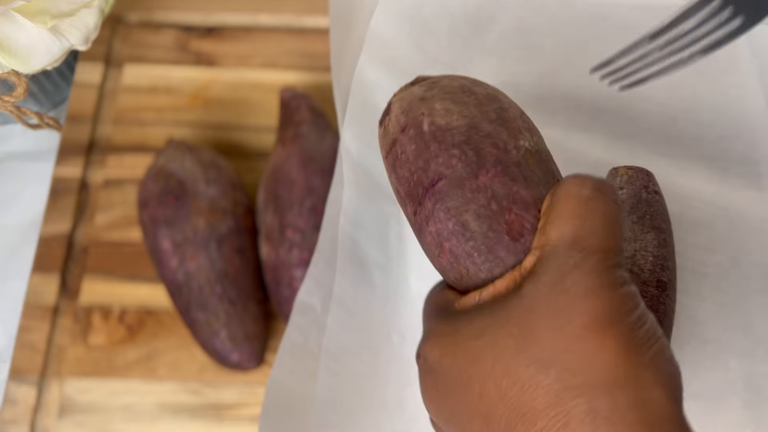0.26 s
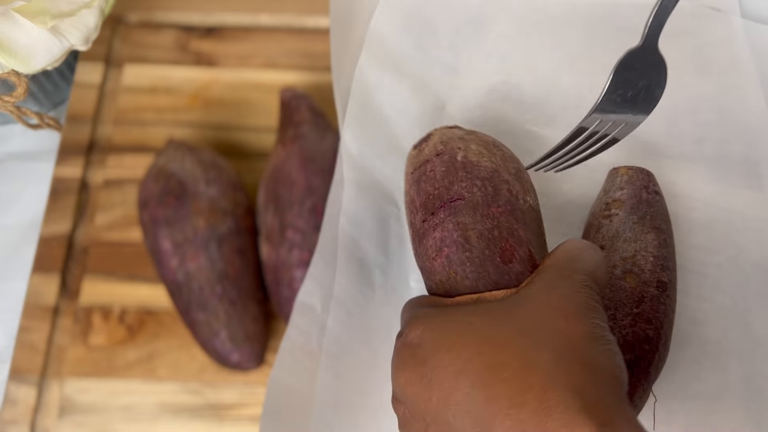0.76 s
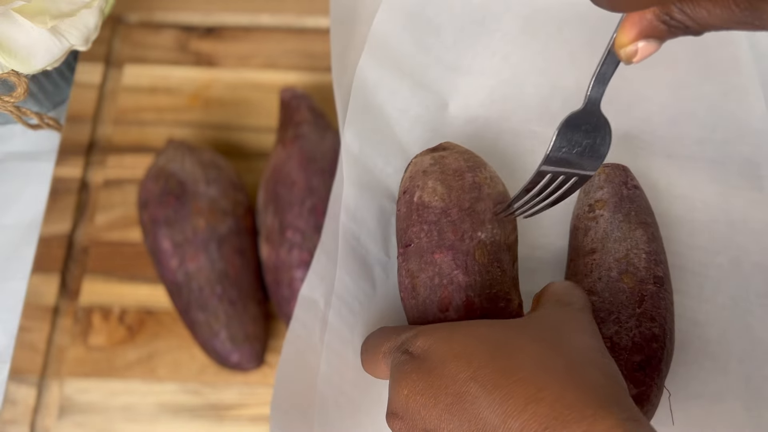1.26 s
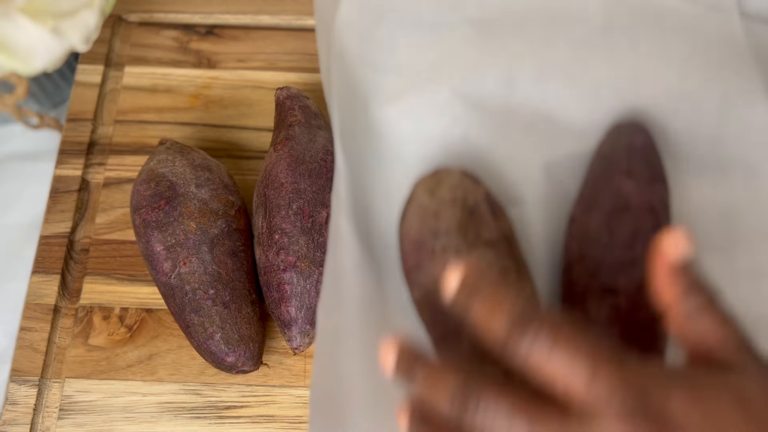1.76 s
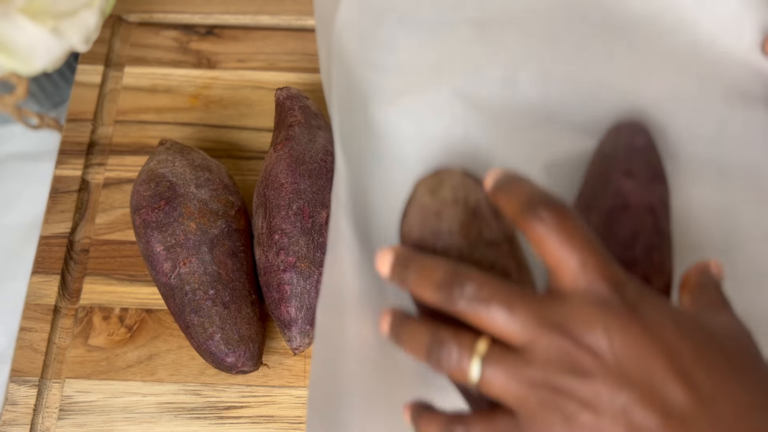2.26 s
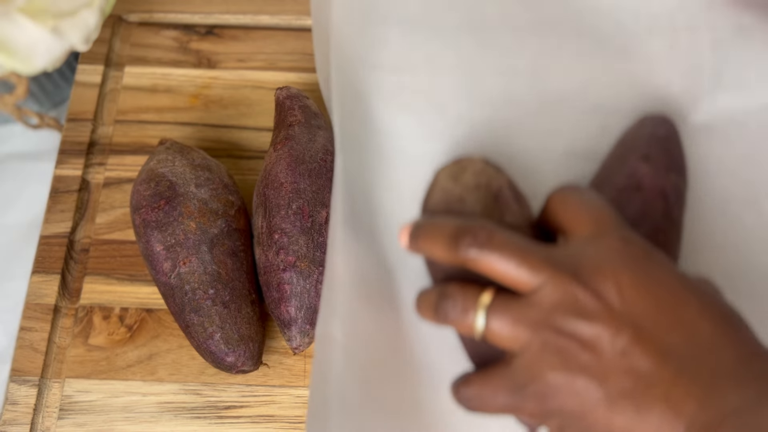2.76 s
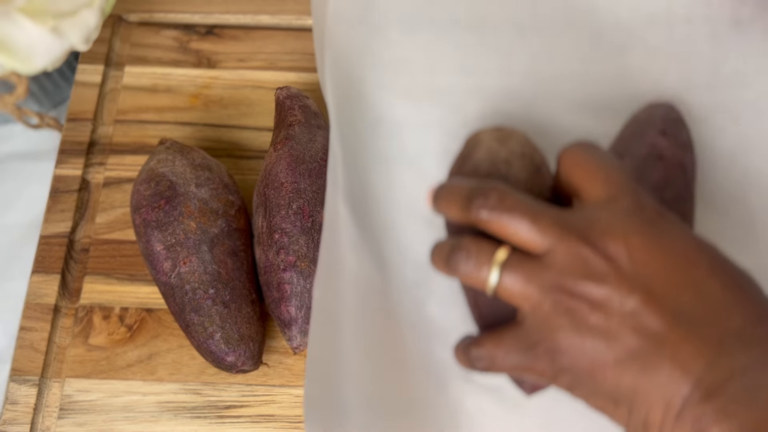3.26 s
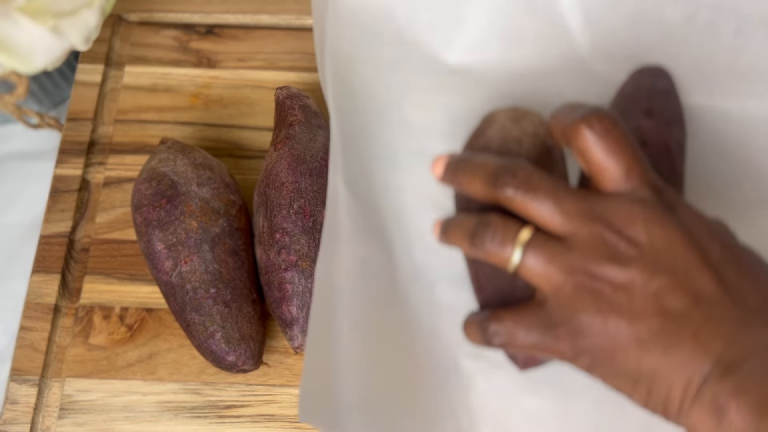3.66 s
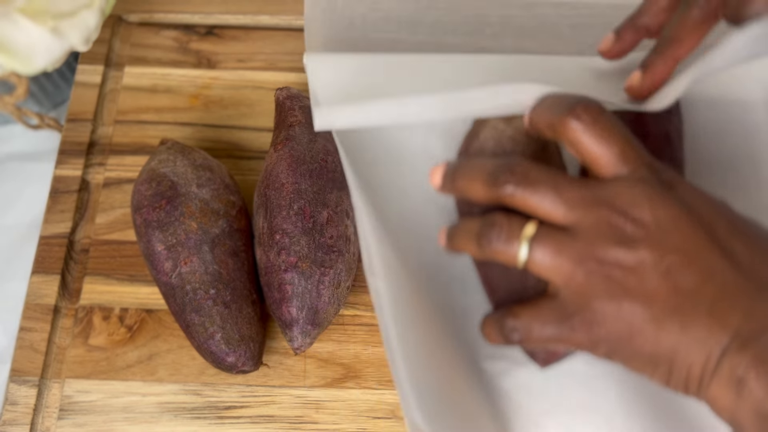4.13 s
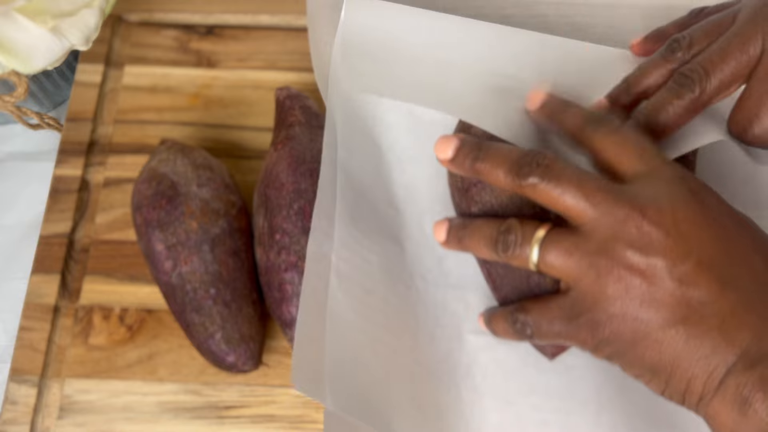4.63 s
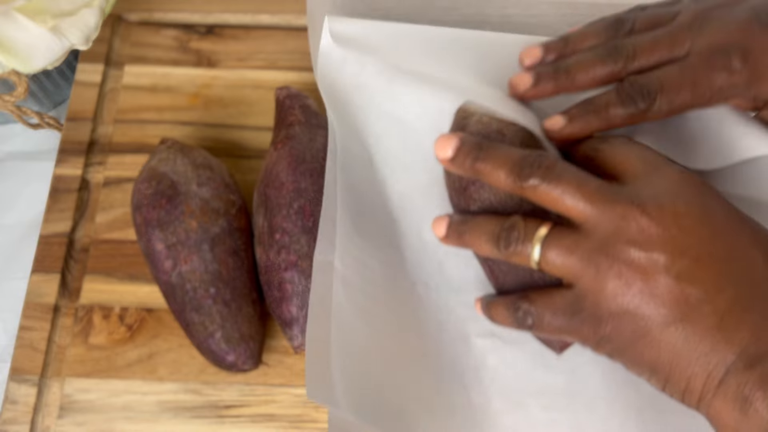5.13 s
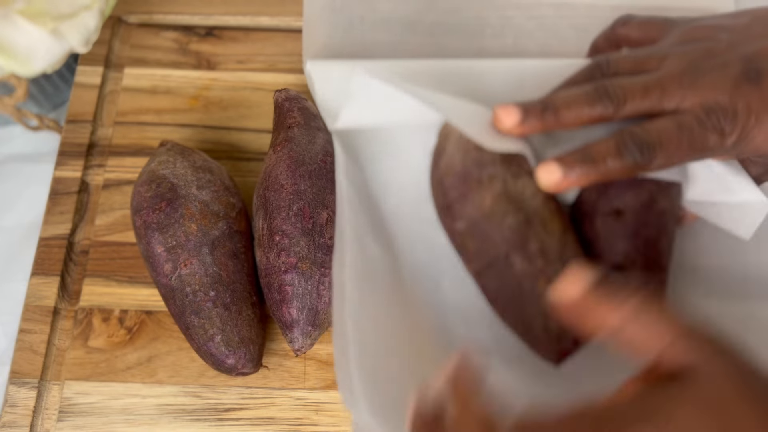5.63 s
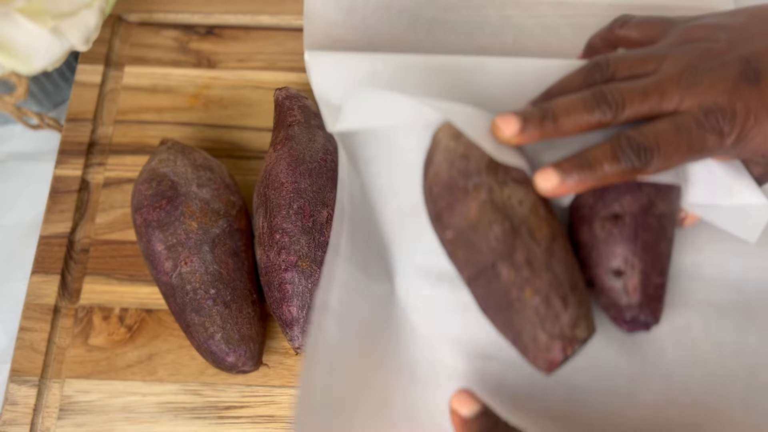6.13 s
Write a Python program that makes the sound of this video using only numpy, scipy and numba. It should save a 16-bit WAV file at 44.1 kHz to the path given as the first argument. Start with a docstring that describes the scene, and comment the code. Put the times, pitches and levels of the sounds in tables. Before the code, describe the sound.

Close by in a small kitchen, low woody bumps give way to bright, crisp crumpling of baking paper, over a quiet steady hum.

```python
"""Sweet potatoes wrapped in baking paper

Sweet potatoes are set down and shifted on baking paper over a wooden board, then the paper is folded over them.
Each bump rings the board's low modes; a dragged potato judders in a short, sagging hoot.
The stiff sheet rustles and crumples in swarms of tiny buckles, snaps at creases and pops as panels flip.
A phone close by, with two microphone ports, hears it in a small kitchen with a low steady hum and a faint whine.
"""
import sys
import numpy as np
from scipy import signal
from scipy.fft import rfft, irfft, next_fast_len
from scipy.io import wavfile
from scipy.ndimage import uniform_filter1d
from numba import njit

SR = 44100
rng = np.random.default_rng(int(sys.argv[2]) if len(sys.argv) > 2 else 0)


def file_out(sig):
    """Save sig as 16-bit WAV at sys.argv[1]."""
    # one column per channel
    cols = np.atleast_2d(sig).T
    # limit, then scale
    lim = np.clip(cols, -1, 1)
    pcm = np.round(lim * 32767).astype(np.int16)
    wavfile.write(sys.argv[1], SR, pcm)


N = 281799
T = np.arange(N) / SR

# rustle of the sheet sliding under the hands: [t/s, relative level/dB]
RUSTLE = [(2.09, -61), (2.26, -56.5), (2.45, -41), (2.64, -47), (2.83, -52.5), (2.94, -48), (3.18, -57),
          (3.34, -45), (3.56, -56), (3.94, -50.5), (4.01, -45.5), (4.4, -45.5), (4.58, -52.5), (5.1, -42),
          (5.26, -52), (5.46, -40), (5.57, -55), (5.72, -42), (6.01, -55.5), (6.27, -41), (6.38, -50)]
# colour of the tiny buckles and creases: [f/Hz, relative level/dB]
CRACKLE = [(300, -21.5), (1200, -15.5), (2500, 4.5), (3400, -2.5), (4800, 0), (6000, -1.5), (7200, -9.5),
           (8400, -6), (9500, -9.5), (12000, -15), (14000, -10), (16000, -19)]
# a whole panel flips over as the sheet is folded: [t/s, relative level over one millisecond/dB, pitch f/Hz]
POPS = [(4.261, -27.5, 1390), (4.355, -35, 1260), (4.51, -30, 1530), (4.6368, -29, 1350),
        (4.7701, -25, 1310), (4.778, -30, 1660), (4.793, -26.5, 1620), (4.803, -29, 1600),
        (4.8401, -17.5, 1540), (5.216, -32, 1125), (5.378, -23, 1220), (5.39, -27, 1400),
        (5.406, -30.5, 1170), (5.425, -24.5, 1350)]


def amp(db):
    """Decibels to gain."""
    return 10 ** (np.asarray(db) / 20)


def convolve(x, response):
    """Pass a sound through a response, channel by channel."""
    return signal.oaconvolve(np.atleast_2d(x), np.atleast_2d(response), axes=-1)[:, :N]


def colour(points, size=1024):
    """Causal (minimum-phase) response of unit energy, shaped by (Hz, dB) points."""
    hz, db = np.transpose(points)
    grid = np.maximum(np.fft.rfftfreq(size, 1 / SR), 1)
    spectrum = amp(np.interp(np.log(grid), np.log(hz), db))
    # folding the cepstrum onto positive times makes the response causal
    cepstrum = irfft(np.log(spectrum))
    cepstrum[1:size // 2] *= 2
    cepstrum[size // 2 + 1:] = 0
    response = irfft(np.exp(rfft(cepstrum)))
    return response / np.linalg.norm(response)


def hum(level_db=-49, apart_hz=900, side_gain=1.05):
    """Steady kitchen background of coloured noise; its bass is alike in both ports."""
    # spectrum of the room: [f/Hz, relative level per Hz/dB]
    hum_colour = [(25, -13), (52, 3), (200, -1), (390, -10), (620, -20.5), (900, -31), (1800, -27),
                  (3300, -40.5), (5200, -37), (8000, -51), (15000, -75)]
    mid, side = convolve(rng.standard_normal((2, N)), colour(hum_colour, size=8192))
    side = signal.sosfilt(signal.butter(1, apart_hz, "high", fs=SR, output="sos"), side)
    return amp(level_db) * (mid + side_gain * side * np.array([[1], [-1]]))


def whine(half_s=0.23, waver_hz=40, knot_samples=512):
    """A faint, thin tone wavers in pitch and flickers in level in the background, then goes."""
    # swells of the tone: [middle t/s, level before the flicker/dB, centre f/Hz]
    tones = [(0.18, -73, 3268), (1.68, -82, 3316)]
    knots = T[::knot_samples]
    waver = np.interp(T, knots, rng.standard_normal(len(knots)))
    flicker = np.interp(T, knots, rng.standard_normal(len(knots)))
    out = np.zeros(N)
    for at, db, hz in tones:
        swell = np.exp(-((T - at) / half_s) ** 4)
        phase = 2 * np.pi * np.cumsum(hz + waver_hz * waver) / SR
        out += amp(db) * swell * np.sin(phase)
    return flicker * out


def board(stiffen=0.097, settle_s=0.0074, thock_db=3, scuff_s=0.0021, split_hz=450):
    """A soft push per bump rings the modes; neighbours swing against each other, so the thud swells and beats."""
    # potatoes bump the board: [t/s, relative level/dB, contact/ms, ring time factor under the hand]
    bumps = [(0.056, -41, 4.1, 0.65), (0.825, -23.5, 1.3, 1), (0.8369, -2.5, 4.7, 1.44),
             (0.866, -26, 1.33, 0.7), (2.099, -26.5, 3.4, 0.76), (2.436, -29.5, 8.74, 1.83),
             (2.702, -25, 8.67, 0.9), (2.867, -33.5, 1.3, 0.3), (2.8805, -10, 6.6, 0.67),
             (3.034, -12.5, 8.2, 0.92), (3.082, -17, 6.4, 0.37), (3.373, -18, 8.9, 1.7),
             (3.388, -14, 1.34, 0.16), (3.3983, 0, 2.97, 0.94), (3.456, -7, 5.66, 0.78),
             (4.65, -29.5, 8.3, 0.95), (4.993, -29.5, 6.9, 1), (5.505, -28, 8.7, 0.58),
             (5.745, -28, 1, 0.5), (5.755, -16, 2.84, 0.62), (6.086, -25.5, 3.05, 1.2),
             (6.173, -23, 2.4, 0.56)]
    # modes of board and counter before each bump bends them: [f/Hz, relative level/dB, t60/s]
    modes = [(52.6, -21.5, 0.36), (68.74, -24, 0.89), (99.8, -26.5, 0.97), (138.9, -14, 0.26),
             (192.6, 3, 0.21), (225.5, -4.5, 0.28), (344, 0.5, 0.042), (260.5, 2.5, 0.22),
             (366, -10.5, 0.28), (533, -2.5, 0.06), (820, -6.5, 0.044), (1194, -8.5, 0.021)]
    # a contact of neutral_ms leaves the modes at their own pitch; a longer one loads the board and rings lower
    neutral_ms, load_exponent = 4.04, 0.028

    out, t = np.zeros(N + SR), T[:SR // 2]
    # the pressed contact is stiffer at first, so the pitch sags as it settles
    clock = t + stiffen * settle_s * (1 - np.exp(-t / settle_s))
    low = np.array(modes)[:, 0] < split_hz
    for at, db, contact_ms, ring_factor in bumps:
        pitch = (neutral_ms / contact_ms) ** load_exponent
        rings = []
        for k, (hz, mode_db, t60) in enumerate(modes):
            fade = np.exp(-np.log(1000) * t / (t60 * ring_factor))
            rings.append((-1) ** k * amp(mode_db) * np.sin(2 * np.pi * hz * pitch * clock) * fade)
        rings = np.array(rings)
        # a longer, softer contact favours the lowest modes
        push = np.sin(np.pi * np.minimum(t[:SR // 50] * 1000 / contact_ms, 1)) ** 2
        thud = signal.fftconvolve(rings[low].sum(0), push)[:len(t)]
        # a scuff of the rough skin wakes the upper modes; only a brief, hard contact makes it heard
        scuff = rng.standard_normal(len(t)) * t * np.exp(-t / scuff_s)
        thock = signal.fftconvolve(rings[~low].sum(0), scuff)[:len(t)]
        thock_gain = amp(thock_db + 10 * (0.5 - contact_ms))
        bump = thud / np.abs(thud).max() + thock_gain * thock / np.abs(thock).max()
        start = int(at * SR)
        out[start:start + len(t)] += amp(db) * bump
    return out[:N] + judder()


def judder():
    """A dragged potato sticks and slips near the board's main mode: a soft hoot that swells, sags and fades."""
    # one hoot: [peak t/s, level/dB, half width/s, f at the peak/Hz, sag/(Hz per s)]
    at, db, width_s, hz, sag_hz_per_s = (3.0605, -7.5, 0.0155, 191, 380)
    t = np.clip(T - at, -.3, .3)
    swell = np.exp(-(t / width_s) ** 2)
    return amp(db) * swell * np.sin(2 * np.pi * (hz * t - sag_hz_per_s * t ** 2 / 2))


def snaps(rows, ripple_db=4, slip_ms=0.69):
    """Each crease gives way in a quick, dying run of slips, with its own tilt and its own uneven colour."""
    out = np.zeros(N + SR)
    hz, db = np.transpose(CRACKLE)
    fade = np.exp(-T[:SR // 100] * 1000 / slip_ms)
    for at, level_db, tilt_db in rows:
        ripple = ripple_db * rng.standard_normal(len(hz))
        crease = colour(np.transpose([hz, db + tilt_db * np.log2(hz) + ripple]))
        # cubed noise: a few strong slips among many weak ones
        slips = fade * rng.standard_normal(len(fade)) ** 3
        click = np.convolve(crease, slips)
        start = int(at * SR)
        # the level is that of the whole click's energy spread over one millisecond
        out[start:start + len(click)] += amp(level_db) * np.sqrt(SR / 1000) * click / np.linalg.norm(click)
    return out[:N]


def avalanche(at, db, swell_ms):
    """Power of a run of buckles: each sets off more until the peak, then they die out."""
    power, start = np.zeros(N), int(at * SR)
    age = T[:min(SR // 5, N - start)] * 1000 / swell_ms
    power[start:start + len(age)] = (amp(db) * np.tanh(2 * age) * age * np.exp(1 - age)) ** 2
    return power


@njit
def grains(starts, hz, cycles, sizes, length):
    """Each grain is a brief ring at its own pitch, fading over a few cycles."""
    out = np.zeros(length)
    for k in range(len(starts)):
        life = cycles[k] * SR / hz[k]  # samples to fade to 1/e
        step = np.exp(2j * np.pi * hz[k] / SR - 1 / life)
        z = sizes[k] / np.sqrt(life) + 0j
        for i in range(starts[k], min(starts[k] + int(6 * life), length)):
            out[i] += z.imag
            z *= step
    return out


def buckles(rate, low_hz, high_hz, cycles, spread_db, even_s):
    """Random buckles, many small and a few large, levelled to even power over even_s seconds."""
    when, pitch, ring, size, sign = rng.random((int(rate * N / SR), 5)).T
    sizes = np.sign(sign - .5) * amp(spread_db * np.minimum(-np.log(1 - size), 4))
    hz = low_hz + pitch * (high_hz - low_hz)
    swarm = grains((when * N).astype(np.int64), hz, cycles * (.5 + ring), sizes, N)
    power = uniform_filter1d(swarm ** 2, max(int(even_s * SR), 2))
    return swarm / np.sqrt(np.maximum(power, 1e-6))


def crackle(sliding, burst_power, top_hz=9500):
    """Tiny buckles of the sheet tick briefly and brightly as it slides and crumples."""
    # level change of the crackle's top treble: [t/s, level/dB]
    top_treble = [(2.7, -2.5), (3.3, -10), (3.6, 0), (4.2, 3.5), (6.1, 1)]
    out = sliding * buckles(rate=2000, low_hz=1800, high_hz=16200, cycles=0.28, spread_db=1.5, even_s=0.21)
    bursts = buckles(rate=2200, low_hz=2450, high_hz=15500, cycles=0.56, spread_db=2, even_s=0.012)
    out += np.sqrt(burst_power) * bursts
    top = signal.sosfiltfilt(signal.butter(3, top_hz, "high", fs=SR, output="sos"), out)
    out += top * (amp(np.interp(T, *np.transpose(top_treble))) - 1)
    return convolve(out, colour(CRACKLE))[0]


def flexing(sliding, crumpling, popping, crumple_flex_db=-3):
    """Larger panels flex at lower pitches than the tiny buckles and ring longer."""
    # colour of flexing panels: [f/Hz, relative level/dB]
    panel_colour = [(150, -27), (350, 4.5), (650, -4.5), (1100, 3), (1650, 4.5), (1950, -2), (2600, 8),
                    (4000, -12.5), (9000, -66.5)]
    # a lifted, folded sheet flexes more than a flat one: [t/s, relative level of flexing/dB]
    lift_curve = [(2.1, -10.5), (3.3, -8.5), (3.7, -2), (4.1, -6), (4.7, -4.5), (5.1, -6), (5.4, -3),
                  (6, -12)]
    lift = amp(np.interp(T, *np.transpose(lift_curve)))
    power = popping + (amp(crumple_flex_db) * lift) ** 2 * crumpling
    slides = buckles(rate=520, low_hz=523, high_hz=2010, cycles=2.4, spread_db=1.0, even_s=0.031)
    bursts = buckles(rate=1800, low_hz=597, high_hz=2123, cycles=2.02, spread_db=10.0, even_s=0.0043)
    return convolve(sliding * lift * slides + np.sqrt(power) * bursts, colour(panel_colour))[0]


def catching(per_s=70, spread_db=3):
    """The sliding sheet catches and lets go, so its rustle comes in short uneven steps."""
    step = np.cumsum(rng.random(N) < per_s / SR)
    levels = amp(spread_db * np.clip(rng.standard_normal(N), -2, 2))
    gain = uniform_filter1d(levels[step], size=64)
    return gain / np.sqrt(np.mean(gain ** 2))


def small_snaps(per_s=43, over_rustle_db=2.5, scatter_db=7, dullest_tilt_db=-13.5):
    """Small creases give way at random while the sheet moves, about as strong as its rustle; tilt per octave."""
    times, rustle_db = np.transpose(RUSTLE)
    when, size, tilt = rng.random((int(per_s * (times[-1] - times[0])), 3)).T
    at = times[0] + when * (times[-1] - times[0])
    db = np.interp(at, times, rustle_db) + over_rustle_db + scatter_db * (2 * size - 1)
    return list(zip(at, db, dullest_tilt_db * tilt))


def pops(cycles=4.3):
    """A flipping panel rings for a few cycles at its own pitch: a hollow pop."""
    at, db, hz = np.transpose(POPS)
    sizes = amp(db) * 2 * np.sqrt(SR / 1000)
    return grains((at * SR).astype(np.int64), hz.copy(), np.full(len(at), float(cycles)), sizes, N)


def paper(slide_db=-3.5, wake_db=-10, wake_ms=1.28):
    """Sliding, crumpling and popping set off swarms of buckles; creases snap and panels pop among them."""
    # a crease gives way and the sheet crumples around it: [start t/s, relative level/dB, swell/ms]
    crumples = [(0.822, -43, 12.4), (1.076, -69, 11.5), (1.326, -61, 8.5), (2.159, -51, 11),
                (2.278, -35, 7.9), (2.369, -35, 21.5), (2.405, -28, 5.3), (2.578, -39, 11),
                (2.601, -28.5, 3.1), (2.645, -32.5, 4.7), (2.668, -38.5, 17), (2.914, -37.5, 6.2),
                (3.015, -34.5, 4.9), (3.258, -40.5, 11), (3.374, -44, 4.1), (3.431, -36, 4.8),
                (3.632, -39.5, 5.1), (3.956, -33, 2.8), (3.975, -38.5, 10), (4.1585, -36, 9.3),
                (4.179, -38, 2.1), (4.287, -37.5, 7.7), (4.428, -34.5, 6.9), (4.646, -38, 8.6),
                (4.845, -35, 1.6), (4.9548, -32, 3.1), (4.968, -27.5, 8.2), (4.987, -38, 7.3),
                (5.1115, -36.5, 5.1), (5.158, -38.5, 4.4), (5.488, -39, 7.4), (5.67, -41.5, 7.5),
                (5.916, -32, 7.2), (6.08, -38, 10.3), (6.192, -32.5, 7.5), (6.274, -28, 10.2)]
    # a single crease snaps: [t/s, relative level over one millisecond/dB, tilt/(dB per octave)]
    crease_snaps = [(0.38, -52, -5), (0.8273, -25.5, -7.5), (1.7392, -44.5, -13.5), (2.649, -27, -8),
                    (2.921, -24.5, -5.5), (3.268, -27, -7.5), (3.39, -24.5, -11), (3.6333, -26, 4),
                    (3.64, -21.5, 0.5), (3.837, -28, 0), (3.8677, -29, -6.5), (3.897, -32.5, -0.5),
                    (3.989, -23.5, -3.5), (4.1105, -26, -6), (4.1775, -23, -1.5), (4.429, -24, 0.5),
                    (4.8412, -22.5, 4), (4.9548, -23, -3), (4.969, -17, 1), (5.1135, -25, 5),
                    (5.4773, -25.5, -3), (5.4925, -26, -6.5), (5.592, -37, -4), (5.6255, -33, 2),
                    (5.7105, -29.5, -1), (6.2825, -26.5, -10)]
    # the rustle rests until the hand arrives
    sliding = amp(slide_db + np.interp(T, *np.transpose(RUSTLE), left=-120)) * catching()
    crumpling = sum(avalanche(at, db, swell_ms) for at, db, swell_ms in crumples)
    # every pop leaves a short wake of buckles
    popping = sum(avalanche(at, db + wake_db, wake_ms) for at, db, _ in POPS)
    swarms = crackle(sliding, crumpling + popping) + flexing(sliding, crumpling, popping)
    return swarms + pops() + snaps(list(crease_snaps) + small_snaps())


def tail(t60, onset_s, channels=2):
    """Dense reflections that swell briefly and die away; unit energy."""
    t = T[:SR // 2]
    envelope = np.exp(-np.log(1000) * t / t60) * (1 - np.exp(-t / onset_s))
    response = rng.standard_normal((channels, len(t))) * envelope
    return response / np.linalg.norm(response, axis=1, keepdims=True)


def echoes(sheet, counter_db=-2.5, room_db=-9, places=4):
    """The crackle hops about the sheet, and each place has its own reflections off counter and walls."""
    # colour of the kitchen echo: [f/Hz, relative level/dB]
    echo_colour = [(200, -4.5), (700, -3.5), (2000, -4.5), (5200, 4.5), (7500, -1.5), (10000, -16.5),
                   (15000, -9.5)]
    hop = 128  # samples
    place = np.repeat(rng.integers(places, size=N // hop + 1), hop)[:N]
    out = 0
    for k in range(places):
        counter = amp(counter_db) * tail(t60=0.057, onset_s=0.00029)
        walls = amp(room_db) * tail(t60=0.21, onset_s=0.0048)
        out = out + convolve(sheet * (place == k), counter + walls)
    return convolve(out, colour(echo_colour))


def ports(x):
    """Sound reaches the two ports with different lag and shading, shared half and half between them."""
    # the two microphone ports: [f/Hz, lag of left behind right/rad, left minus right level/dB]
    port_curve = [(400, 0, 3), (1500, 1.5, 4), (2200, 2.1, 2), (4800, 6.2, 7), (6000, 7.7, 5),
                  (7300, 5.8, 0), (9300, 9.2, -1), (10600, 9.5, -1), (12000, 12.1, 0), (15700, 13.8, -1)]
    hz, lag, tilt_db = np.transpose(port_curve)
    size = next_fast_len(N + SR // 10)
    f = np.fft.rfftfreq(size, 1 / SR)
    half = amp(np.interp(f, hz, tilt_db) / 2) * np.exp(-.5j * np.interp(f, hz, lag))
    return irfft(rfft(x, size) * np.array([half, 1 / half]), size)[:, :N]


def scene(direct_db=-1, boom_db=-15, board_left_db=1):
    """Paper and board heard directly, off the counter and from the kitchen walls, over hum and whine."""
    sheet, thuds = paper(), board()
    heard_paper = ports(amp(direct_db) * sheet + echoes(sheet))
    near_thuds = thuds * amp(np.array([[1], [-1]]) * board_left_db / 2)
    boom = amp(boom_db) * convolve(thuds, tail(t60=0.28, onset_s=0.0076))
    return heard_paper + near_thuds + boom + hum() + whine()


def record(dry, bass_hz=42, top_hz=15900, ceiling=.97):
    """The phone drops the deepest bass, rounds the loudest peaks and cuts the top of the treble."""
    thinned = signal.sosfilt(signal.butter(2, bass_hz, "high", fs=SR, output="sos"), dry)
    rounded = thinned / (1 + (thinned / ceiling) ** 8) ** (1 / 8)
    return signal.sosfilt(signal.ellip(10, .2, 80, top_hz, fs=SR, output="sos"), rounded)


dry = scene()
out = record(dry)
file_out(out)
```